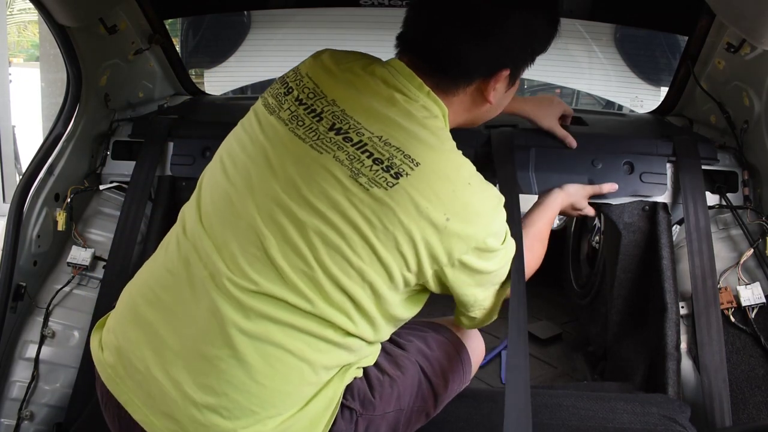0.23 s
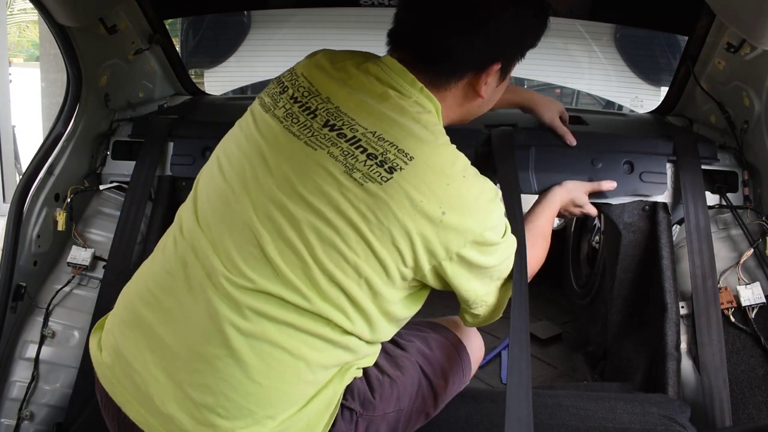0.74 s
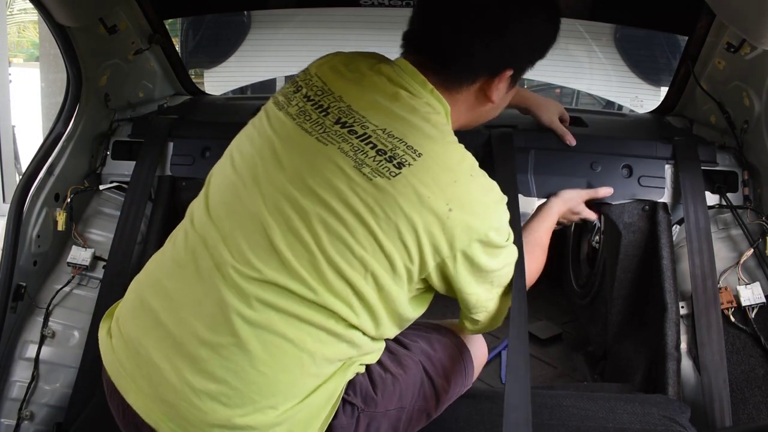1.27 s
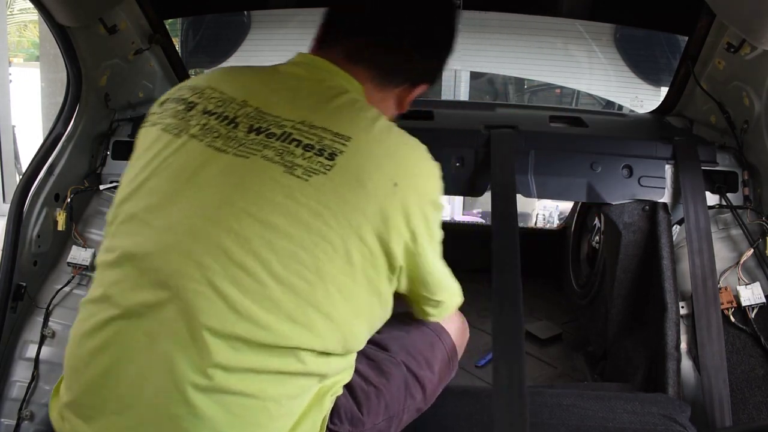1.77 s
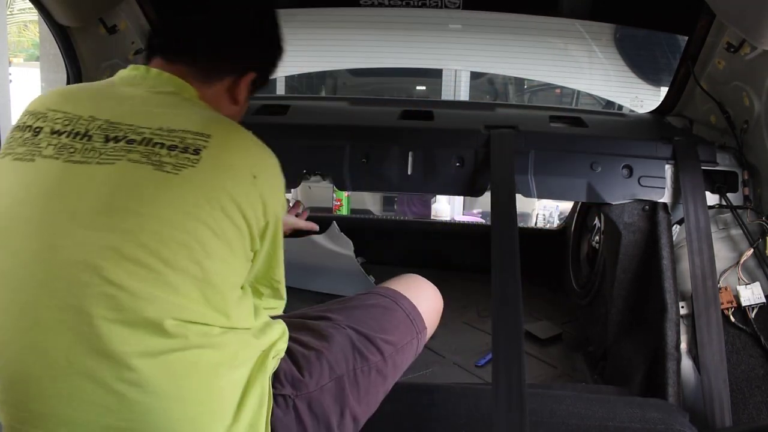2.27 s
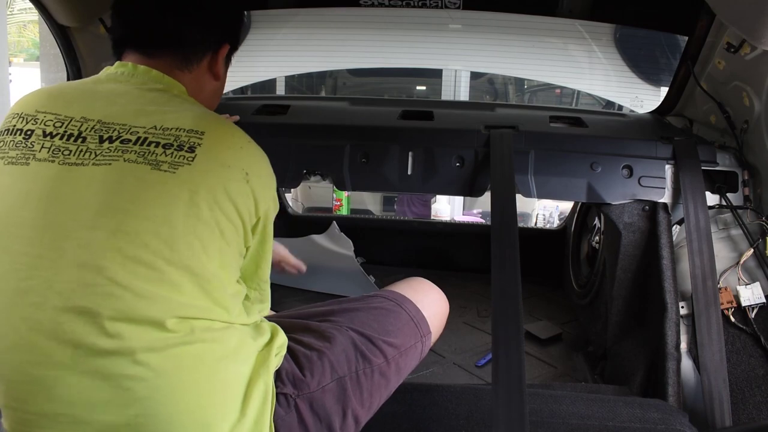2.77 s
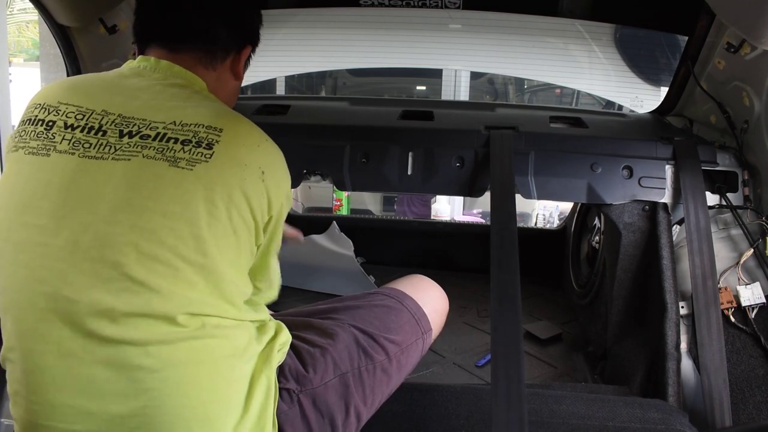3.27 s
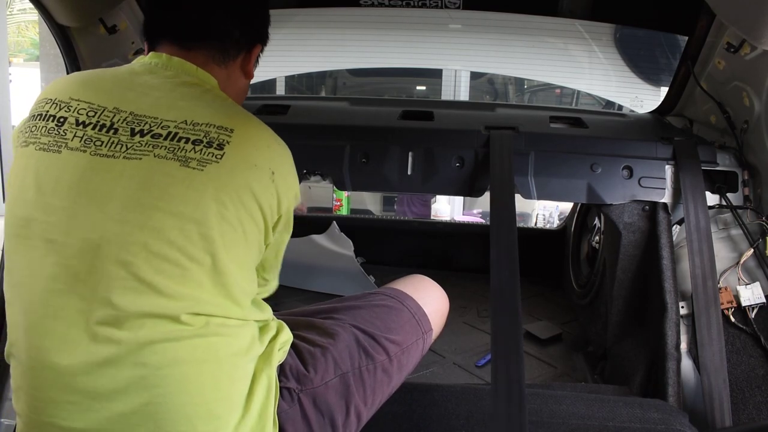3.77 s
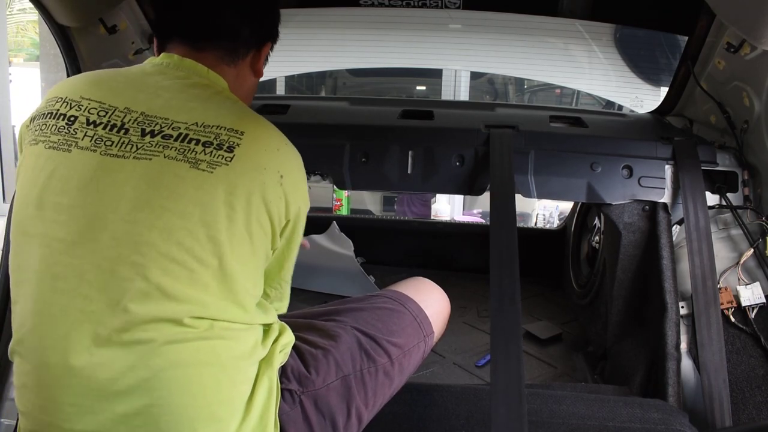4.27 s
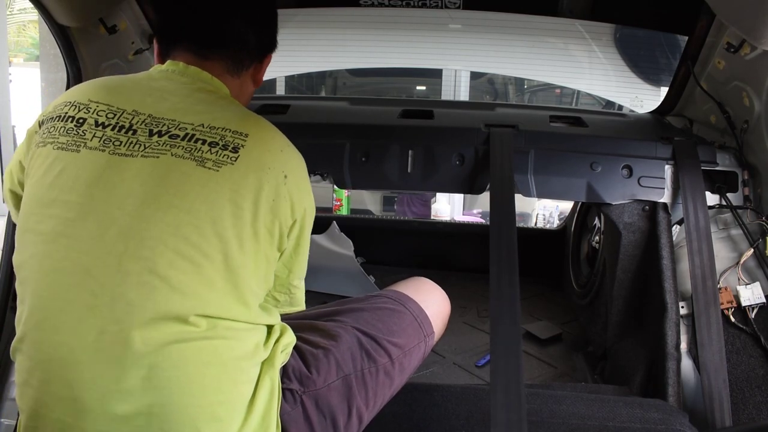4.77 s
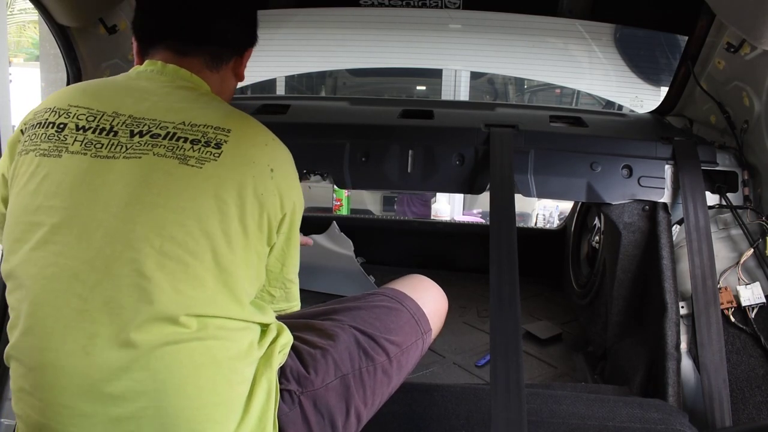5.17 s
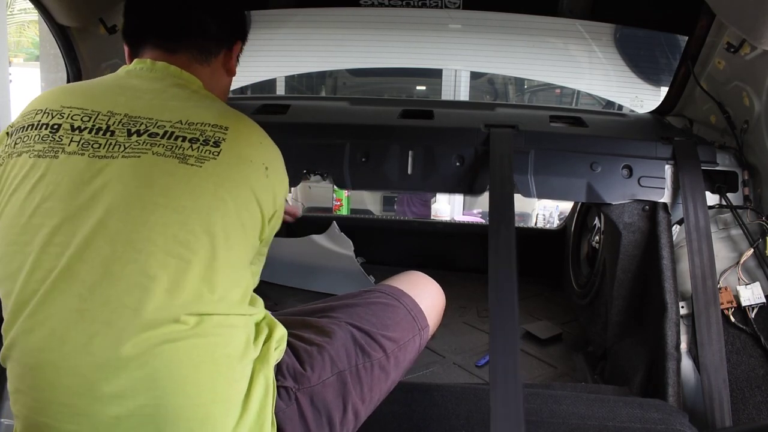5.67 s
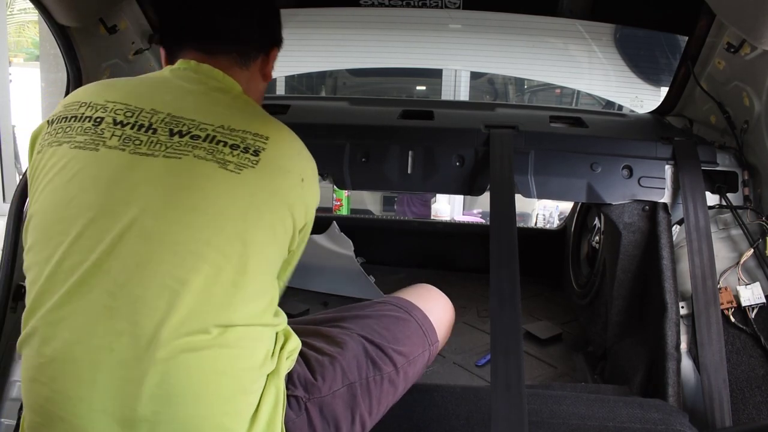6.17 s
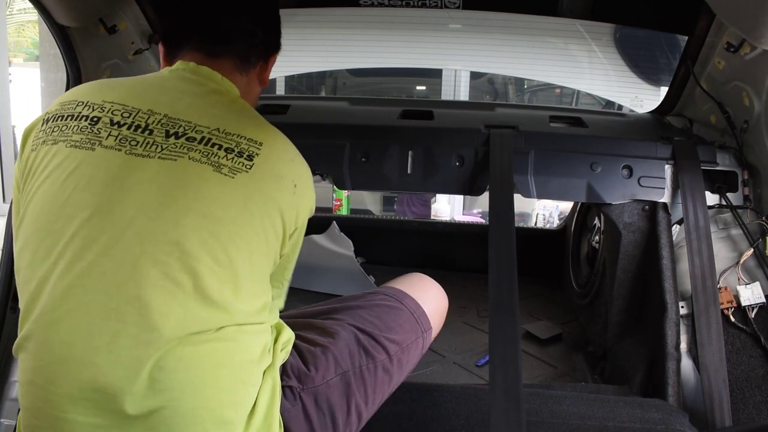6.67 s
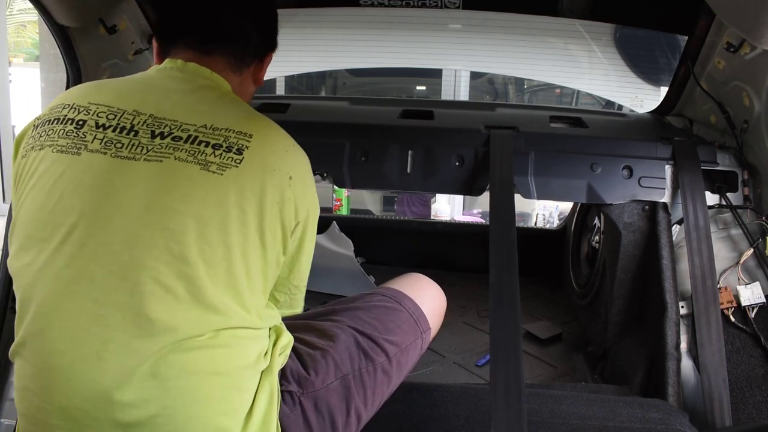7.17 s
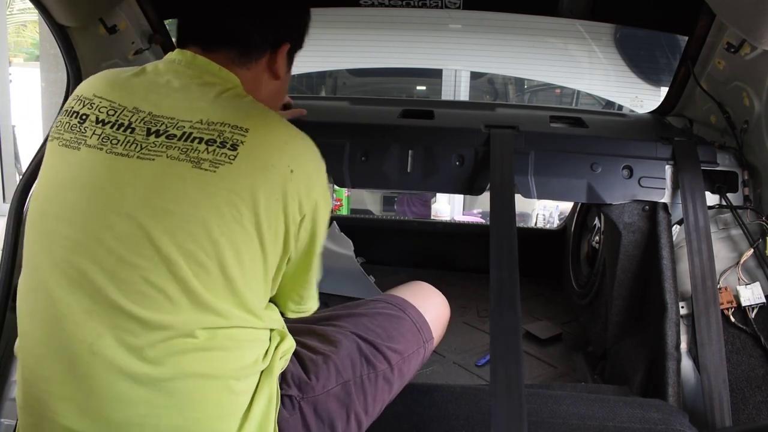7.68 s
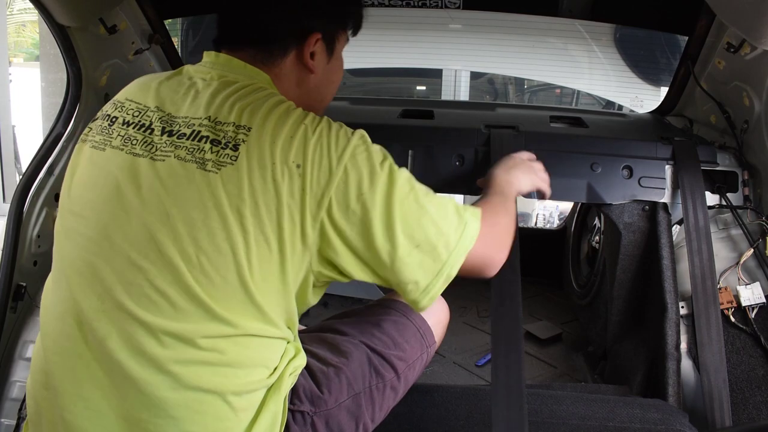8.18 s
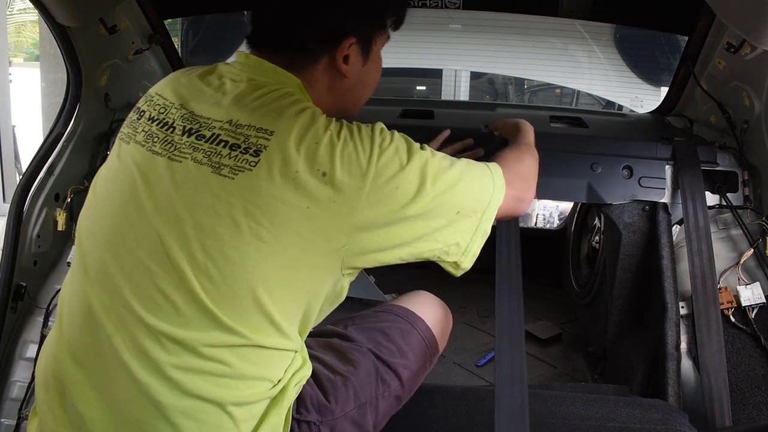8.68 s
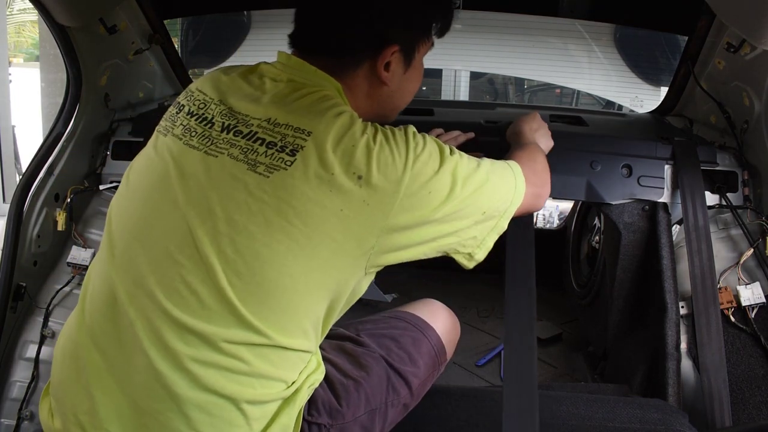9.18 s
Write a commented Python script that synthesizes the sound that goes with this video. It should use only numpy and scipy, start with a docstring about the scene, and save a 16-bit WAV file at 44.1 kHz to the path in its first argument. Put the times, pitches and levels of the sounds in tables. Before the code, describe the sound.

A small stripped car cabin with faint street wash and cloth rustle, heard through a dull, thin camera microphone. From 0.2 to 1.3 seconds, irregular light plastic knocks and clacks, a couple of them sharper at 0.8 and 1.3. Quiet handling until faint ticks at 2.1 to 2.3. From 2.6 to 4.5, hard palm blows come about every 0.3 seconds: a dull fleshy thump, bright crack of plastic on sheet metal, and loose rattle bouncing away. Low shelf booms climb slightly in pitch under the blows until about 4; one blow near 3.8 clips briefly. A lull holds only tiny contacts. Rattling thumps return at 5.7, 6.25, 6.6 and 6.9, with a softer swelling clatter around 7.45. Afterwards just faint rubs and taps at 8.5 to 9.3, one small knock at 9.0. Short sparse echoes follow each hit.

```python
"""Shelf trim beaten onto its clips

Inside a stripped car cabin a hand pushes and beats the rear shelf trim onto its clips. Shaped noise drives
ringing modes and broad colours: dull palm thuds, a clatter of plastic on sheet metal that bounces away, and
soft contacts and dense rattle swarms that swell up. The shelf booms as a low climbing note, sparse echoes give
the cabin, and street wash with cloth rustle comes from random spectra. A dull camera microphone overloads
once, as one wrapped sample."""
import sys
import numpy as np
from scipy import signal
from scipy.fft import rfft, irfft
from scipy.io import wavfile
from scipy.ndimage import uniform_filter1d, minimum_filter1d

SR = 44100
rng = np.random.default_rng(int(sys.argv[2]) if len(sys.argv) > 2 else 0)


def materialize(psi):
    """Save the field psi as 16-bit PCM at rate SR to the path in sys.argv[1].

    A 1-D psi becomes a single channel; in a 2-D psi each row is a channel.
    """
    bounded = np.clip(np.atleast_2d(psi).T, -1, 1)
    quanta = np.round(bounded * 32767).astype(np.int16)
    wavfile.write(sys.argv[1], SR, quanta)


N = 415422  # samples in the scene
LENGTH = 8192  # samples in one contact sound

# Palm landings: start_s, push_level_db, pitch_hz, dying_s, rattle_db (the level its rattle falls away from)
PALMS = [(2.627, -28.5, 546, 0.11, -25.5), (2.927, -16.5, 135, 0.21, -6), (3.19, -8.5, 358, 0.07, -5.5),
         (3.475, -13.5, 361, 0.12, -10), (3.736, -14, 358, 0.15, -8), (4.06, -13, 159, .067, -8.5),
         (4.136, -14, 142, 0.032, -18), (4.381, -10, 432, 0.036, -11), (5.674, -16.5, 343, 0.22, -14.5),
         (6.221, -27.5, 368, .1, -24), (6.245, -11.5, 426, 0.054, -16), (6.56, -14, 372, 0.21, -12),
         (6.912, -10.5, 375, 0.1, -6), (7.423, -30, 398, 0.15, -15)]
# Modes of the trim on its sheet metal: pitch_hz, level_db, t60_s
TRIM_MODES = [(767, 9.5, 0.024), (852, 3, 0.12), (957, 8.5, 0.079), (1088, 6, 0.039), (1305, 8.5, 0.0604),
              (1532, -8.5, 0.27), (1770, 0, 0.18), (2062, 3.5, 0.087), (2370, -14, .07), (2540, 0, 0.055),
              (2850, -3.5, .06), (3010, -12.5, 0.038), (3400, -14, .04), (3690, 6, 0.037), (3866, 6, 0.029)]
# Low modes of the body: pitch_hz, level_db, t60_s
BODY_MODES = [(138, 0.0045, 0.28), (189.3, 0.0019, 0.082), (248.4, 0, 0.055), (317, 0.017, 0.11),
              (398, 0.013, 0.023), (434.5, 0.024, 0.12), (502, 0, 0.061), (549, 0.011, 0.23),
              (680, 0.0088, .06)]
# Broad colour of the clatter: frequency_hz, relative_density_db (per Hz)
CLATTER_COLOUR = [(290, -41.5), (500, -3), (1210, -9), (1530, -4), (1930, -7), (2060, -7.5), (2230, -6),
                  (2920, -14), (5390, -24.5), (6160, -31.5), (7200, -58), (9360, -99), (15800, -120)]
# Broad colour of the thud: frequency_hz, relative_density_db (per Hz)
THUD_COLOUR = [(15, -38.5), (25, -18.5), (111, -1), (345, -1.5), (608, -6.5), (738, -15.5), (1040, -3.5),
               (1200, -23.5), (1560, -49), (2640, -120)]


def amp(db):
    """Decibels to gain."""
    return 10 ** (np.asarray(db) / 20)


def evened(x):
    """Scales to rms 1."""
    return x / np.sqrt(np.mean(x ** 2, axis=-1, keepdims=True) + 1e-20)


def read(points, hz):
    """Reads a table of (Hz, value) along a log-frequency axis."""
    f, value = np.transpose(points)
    return np.interp(np.log(hz + 1), np.log(f + 1), value)


def add(mix, start_s, sound):
    """Mixes a sound in at its start time."""
    part = mix[round(start_s * SR):][:len(sound)]
    part += sound[:len(part)]


def place(starts_s, sounds):
    """Mixes the sounds at their times, ends faded."""
    out = np.zeros(N)
    fade = signal.windows.tukey(2 * LENGTH, .3)[LENGTH:]
    for start_s, sound in zip(starts_s.ravel(), sounds * fade):
        add(out, start_s, sound)
    return out


def lowpass(x, hz):
    """Steep band limit by a long linear-phase filter."""
    taps = signal.firwin(511, hz, window=("kaiser", 9), fs=SR)
    return signal.oaconvolve(x, taps, "same")


def swell(rise_s, dying_s):
    """Envelope of peak 1: a rounded rise and a fall of 60 dB per dying time."""
    t = np.arange(LENGTH) / SR
    rise = (1 - np.exp(-t / np.clip(rise_s, 2e-4, .05))) ** 2
    shape = rise * amp(-60 * t / np.clip(dying_s, .006, .4))
    return shape / shape.max(axis=1, keepdims=True)


def causal(colour):
    """Minimum-phase response of a colour, so that nothing sounds before the blow."""
    hz = abs(np.fft.fftfreq(2 * LENGTH, 1 / SR))
    log_gain = np.log(amp(np.maximum(read(colour, hz), -100)))
    return np.exp(log_gain - 1j * signal.hilbert(log_gain).imag)[:LENGTH + 1]


def ringing(modes):
    """One decaying sine response per mode, of equal energy before its level."""
    t = np.arange(2 * LENGTH) / SR
    return np.array([amp(db) * rfft(evened(amp(-60 * t / t60) * np.sin(2 * np.pi * hz * t)))
                     for hz, db, t60 in modes])


def struck(modes, spot_hz, reach, far, colour):
    """Two responses of a struck spot: its modes, those near its pitch strongest, and a broad colour."""
    distance = np.log(np.array(modes)[:, 0] / spot_hz)
    weight = np.exp(-(distance / reach) ** 2) + far
    signs = rng.choice([-1., 1.], weight.shape)
    rings = (weight * signs) @ ringing(modes)
    hz = np.fft.rfftfreq(2 * LENGTH, 1 / SR) + 1
    # The damped spot itself lifts a wide band
    broad = 1 + 1.5 / (1 + 4j * (hz / spot_hz - spot_hz / hz))
    return np.array([rings, broad]) * causal(colour)


def drive(shape, responses, ring_share, grit_db):
    """Uneven small contacts, in clumps of about a millisecond, pass the ringing and the broad response."""
    noise, sizes = rng.standard_normal((len(shape), 2, LENGTH)).transpose(1, 0, 2)
    clumps = evened(uniform_filter1d(sizes, size=40))
    force = noise * shape * amp(grit_db * clumps)
    rings, broad = evened(irfft(rfft(force, 2 * LENGTH) * responses)[..., :LENGTH])
    ring_share = np.clip(ring_share, 0, 1)
    blend = evened(ring_share * rings + (1 - ring_share) * broad)
    # A longer envelope carries more energy
    return blend * np.sqrt(np.mean(shape ** 2, axis=1, keepdims=True))


def contacts(start_s, peak_db, bite_db, thud_db, spot_hz, thud_hz, dying_s, first_gain, rise_s):
    """A short first contact, then a swarm: clatter of the trim, its treble bite and a slower body thud."""
    # Stiff, high spots ring more: spot_pitch_hz, ring_share (0-1)
    ring_by_pitch = [(800, 0.2), (1500, 0.27), (2100, 0.4), (3000, 0.5)]
    low, high = (signal.freqz(*signal.butter(2, 2400, kind, fs=SR), LENGTH + 1)[1] for kind in ("low", "high"))
    first = first_gain * swell(0.00021 + 0 * start_s, 0.0069)

    clatter_shape = 0.99 * first + swell(0.0011 + rise_s, dying_s)
    spot = struck(TRIM_MODES, spot_hz, .07, .12, CLATTER_COLOUR)
    clatter = drive(clatter_shape, low * spot, read(ring_by_pitch, spot_hz), grit_db=4.5)
    clatter = clatter / abs(clatter).max(axis=1, keepdims=True)

    # The stiff clips ring high; gentle contacts are duller
    clip = struck(TRIM_MODES, 3050 + 0 * start_s, .08, .2, CLATTER_COLOUR)
    dulling_hz = 6000 * amp(0.3 * peak_db)
    clip = clip / (1 + 1j * np.fft.rfftfreq(2 * LENGTH, 1 / SR) / dulling_hz)
    bite_shape = first + swell(0.0024 + rise_s, 0.6 * dying_s)
    bite = drive(bite_shape, high * clip, ring_share=0.38, grit_db=3.0)

    body = struck(BODY_MODES, thud_hz, 0.082, .2, THUD_COLOUR)
    thud_shape = swell(0.00063 + rise_s, 1.08 * dying_s)
    thud = drive(thud_shape, body, ring_share=.47, grit_db=1.0)

    treble_and_clatter = amp(peak_db) * (clatter + amp(bite_db) * bite)
    return place(start_s, treble_and_clatter + amp(thud_db) * thud)


def knocks():
    """Hard contacts of trim and metal start at once, with a strong first crack."""
    # Distinct contacts: start_s, clatter_peak_db, bite_db (above 2.4 kHz, against the clatter peak),
    # thud_level_db, spot_pitch_hz, thud_pitch_hz, dying_s (bite and thud scale it)
    knock_table = [(0.17, -20, -19.5, -35.5, 1400, 530, 0.14), (0.32, -12, -15, -18, 1270, 283, 0.11),
                   (0.425, -23.5, -6, -37.5, 1430, 256, 0.13), (0.566, -16.5, -12.5, -29, 1060, 465, 0.087),
                   (0.8, -8.5, -19, -22, 1140, 520, 0.11), (0.864, -23.5, -19, -26.5, 1590, 536, 0.044),
                   (1, -24, -22, -38, 1540, 511, 0.12), (1.044, -25, -26, -32, 1730, 390, 0.28),
                   (1.277, -33, -3, -34, 1960, 500, 0.12), (1.312, -6, -10, -25.5, 2200, 475, 0.068),
                   (2.107, -38, -17, -33.5, 703, 468, 0.16), (2.205, -34, -18, -29, 1320, 208, 0.077),
                   (2.321, -26, -28, -31.5, 1450, 208, 0.069), (2.663, -10.5, -13, -18, 1810, 500, 0.071),
                   (2.676, -14.5, -10, -20, 1660, 266, 0.12), (2.741, -17.5, -38, -23, 1130, 141, 0.05),
                   (2.94, -8, -9, -20, 840, 127, 0.087), (2.964, -3, -14.5, -17.5, 1520, 344, 0.13),
                   (2.974, -6, -10, -21.5, 2570, 323, 0.043), (3.017, -22, -8.5, -13.5, 960, 141, 0.1),
                   (3.202, -5, -8.5, -12.5, 705, 363, 0.06), (3.225, -4.5, -9.5, -21.5, 1820, 540, 0.065),
                   (3.235, -3, -10, -24, 1690, 670, 0.068), (3.291, -10.5, -14, -20.5, 1730, 148, 0.22),
                   (3.483, -7.5, -7, -10.5, 753, 360, 0.074), (3.502, -15, -5, -21, 1550, 320, 0.16),
                   (3.518, -2, -9.5, -20, 3060, 331, 0.045), (3.557, -15.5, -11, -18, 942, 145, 0.2),
                   (3.746, -6.5, -9.5, -12.5, 3030, 376, 0.078), (3.77, -12, -9, -11, 974, 385, 0.071),
                   (3.784, -5, -4, -18, 2910, 368, 0.06), (3.837, -15.5, -16, -20.5, 1410, 147, 0.2),
                   (4.071, 0.5, -15.5, -12, 740, 227, 0.092), (4.095, -3, -17, -17, 1530, 620, 0.15),
                   (4.149, -3, -12.5, -19, 2060, 447, 0.081), (4.163, -22, -19, -18, 2060, 564, 0.13),
                   (4.199, -18, -10, -18.5, 1570, 423, 0.089), (4.392, -7.5, -8, -13.5, 696, 336, 0.16),
                   (4.415, -4, -13, -17, 1330, 421, 0.13), (4.456, -6.5, -12.5, -16.5, 1770, 248, 0.11),
                   (4.555, -26.5, -10, -30, 2420, 500, 0.058), (4.942, -29.5, -15.5, -56, 1800, 307, 0.11),
                   (5.114, -32, -27, -50, 950, 544, 0.093), (5.296, -27.5, -21.5, -46, 1420, 428, 0.074),
                   (5.594, -33, -16.5, -27, 1130, 464, 0.089), (5.682, -9, -14.5, -21.5, 2500, 350, 0.2),
                   (5.711, -6, -12, -20, 1550, 450, 0.091), (5.742, -13.5, -12, -21, 2050, 367, 0.18),
                   (6.253, -11.5, -12, -18, 2040, 432, 0.13), (6.278, -5, -12, -20, 1760, 417, 0.2),
                   (6.308, -14, -4, -21.5, 1750, 450, 0.14), (6.353, -16, -7.5, -24, 1770, 495, 0.061),
                   (6.573, -6.5, -11.5, -11.5, 1190, 385, 0.14), (6.602, -1, -10.5, -16, 1330, 560, 0.07),
                   (6.639, -11.5, -4.5, -20, 1800, 514, 0.071), (6.655, -3.5, -13.5, -28, 2100, 657, 0.12),
                   (6.692, -13, -10, -24.5, 2030, 550, 0.14), (6.923, -4, -10, -6.5, 1300, 376, 0.067),
                   (6.941, -12.5, -19, -25, 970, 385, 0.15), (6.969, -11, -11, -17.5, 810, 416, 0.23),
                   (7.008, -3.5, -12.5, -17, 1790, 425, 0.12), (7.045, -11.5, -8, -17.5, 1780, 433, 0.081),
                   (7.465, -8, -7, -21, 2100, 189.5, 0.087), (7.502, -15, -12, -29, 1580, 502, 0.18),
                   (8.468, -36.5, -12, -40, 1560, 446, 0.15), (8.995, -21.5, -11.5, -35.5, 1100, 600, 0.11)]
    columns = np.transpose(knock_table)[:, :, None]
    return contacts(*columns, first_gain=amp(-0.5), rise_s=0 * columns[0])


def palms():
    """Soft flesh gives a slow push on the body with a faint slap on the trim."""
    start_s, push_db, pitch_hz, dying_s = np.transpose(PALMS)[:4, :, None]
    slap_db = -13.5  # against the push
    shape = swell(.005, dying_s)
    body = struck(BODY_MODES, pitch_hz, 0.21, 0.17, THUD_COLOUR)
    push = drive(shape, body, ring_share=0.64, grit_db=-3.0)
    trim = struck(TRIM_MODES, pitch_hz, 1, 1, CLATTER_COLOUR)
    slap = drive(shape, trim, ring_share=0, grit_db=2.0)
    return place(start_s, amp(push_db) * (push + amp(slap_db) * slap))


def rattles(count=7):
    """After each palm the loose trim bounces at uneven moments, ever weaker but for a small random spread."""
    from_s, to_s = .025, .26  # after the palm
    fall_db_per_s, spread_db = 114, 1
    bite_db, thud_db = -10, -11.5  # against each bounce
    when, size, spot, body = rng.random((len(PALMS), count, 4)).transpose(2, 0, 1)
    after_s = from_s + (to_s - from_s) * (np.arange(count) + when) / count
    palm_s, rattle_db = np.array(PALMS)[:, [0, 4]].T[:, :, None]
    peak_db = rattle_db - fall_db_per_s * after_s + spread_db * (2 * size - 1)
    start_s, peak_db = (palm_s + after_s).reshape(-1, 1), peak_db.reshape(-1, 1)
    spot_hz = np.interp(spot, (0, 1), (1000, 2100)).reshape(-1, 1)
    thud_hz = np.interp(body, (0, 1), (150, 532)).reshape(-1, 1)
    return contacts(start_s, peak_db, bite_db, peak_db + thud_db, spot_hz, thud_hz,
                    dying_s=0.12, first_gain=0.27, rise_s=0 * start_s)


def swarms():
    """Soft contacts and dense rattle swarms on the trim: they swell up, with no first crack."""
    # Swarms: start_s, clatter_peak_db, rise_s (added to each layer's own rise), dying_s (bite and thud scale it)
    swarm_table = [(2.625, -22.5, .02, 0.19), (2.84, -39.5, .04, .3), (5.575, -26, 0.025, 0.19),
                   (6.265, -14, 0.013, 0.19), (7.389, -25, .04, 0.2), (7.435, -16, 0.027, 0.21),
                   (8.721, -32.5, 0.018, 0.28), (8.751, -34, .004, 0.065), (8.85, -32, 0.044, 0.38),
                   (9.246, -32.5, .02, 0.11)]
    start_s, peak_db, rise_s, dying_s = np.transpose(swarm_table)[:, :, None]
    bite_db, thud_db = -14.5, -15  # against the clatter peak
    spot_hz, thud_hz = 1480 + 0 * start_s, 418 + 0 * start_s
    return contacts(start_s, peak_db, bite_db, peak_db + thud_db, spot_hz, thud_hz, dying_s,
                    first_gain=0, rise_s=rise_s)


def booms():
    """The shelf springs back: one low note swells, climbs and dies; the higher notes ride with it."""
    # Spring-backs: start_s, low_note_peak_db
    boom_table = [(2.737, -32.5), (3.014, -15.5), (3.282, -15), (3.552, -13.5), (3.833, -15.5)]
    # Higher notes of the shelf: pitch_hz, level_db (against the low note)
    shelf_notes = [(250, -13.5), (435, -16), (560, -12.5)]
    start_hz, settled_hz = 140.4, 168.2  # the note climbs as the shelf beds down on its clips
    climb_s, swell_s, dying_s = 0.042, 0.015, 0.3
    out, t = np.zeros(N), np.arange(SR // 2) / SR
    low_hz = settled_hz - (settled_hz - start_hz) * np.exp(-(t / climb_s) ** 2)
    low_note = np.sin(2 * np.pi * np.cumsum(low_hz) / SR)
    notes = low_note + sum(amp(db) * np.sin(2 * np.pi * hz * t) for hz, db in shelf_notes)
    shape = (1 - np.exp(-t / swell_s)) * amp(-60 * t / dying_s)
    for start_s, peak_db in boom_table:
        add(out, start_s, amp(peak_db) * shape / shape.max() * notes)
    return out


def cabin(x):
    """Sparse echoes of random sign off glass and bare metal, each band dying at its own speed."""
    # Decay of the cabin: frequency_hz, t60_s
    cabin_decay = [(200, 0.56), (3000, 0.34), (6000, 0.55)]
    taps = np.zeros(SR // 2)
    at = np.arange(100, SR // 2 - 20, 20)
    taps[at + rng.integers(0, 20, len(at))] = rng.choice([-1., 1.], len(at))
    hz, t, spectra = signal.stft(taps, SR, nperseg=256)
    decay = amp(-60 * t / read(cabin_decay, hz)[:, None])
    tail = signal.istft(spectra * decay, SR, nperseg=256)[1]
    return signal.fftconvolve(x, tail / np.linalg.norm(tail))[:N]


def wash():
    """Street wash and cloth rustle: random short-time spectra with drifting patches and a light flicker."""
    # Colour of the wash: frequency_hz, relative_density_db (per Hz)
    wash_colour = [(30, -24), (190, -3.5), (310, -8), (500, -3), (800, -8), (1100, -6), (1550, 0.5),
                   (2000, -5), (2700, -11), (3800, -19), (5300, -33.5), (7200, -51)]
    # Course of wash and rustle: time_s, relative_level_db, rumble_db (extra weight under 700 Hz)
    stir = [(0.0, -44, 4.5), (0.97, -42, 1.5), (2.02, -45.5, 1), (3.67, -37, 7.5), (4.85, -46.5, 1),
            (5.51, -47.5, -2), (6.9, -40.5, 7), (7.66, -48, 2.5), (9.42, -45, 5.5)]
    frames, hz = N // 128 + 5, np.fft.rfftfreq(512, 1 / SR)[:, None]
    real, imag, patches = rng.standard_normal((frames, 257, 3)).T
    patches = uniform_filter1d(uniform_filter1d(patches, size=16, axis=1), size=5, axis=0)
    patches_db = 2.0 * patches / patches.std()
    flicker_db = 0.3 * evened(uniform_filter1d(rng.standard_normal(frames), size=5))

    time_s, level_db, rumble_db = np.transpose(stir)
    t = np.arange(frames) * 128 / SR
    level_now_db = np.interp(t, time_s, level_db)
    tilt_db = np.interp(t, time_s, rumble_db) / (1 + (hz / 700) ** 4)
    # Busier is brighter
    tilt_db += 0.22 * (level_now_db - level_db.min()) / (1 + (2500 / (hz + 1)) ** 4)
    spectra = (real + 1j * imag) * amp(patches_db + flicker_db + tilt_db + level_now_db)
    uncoloured = signal.istft(spectra, nperseg=512, noverlap=384)[1][:N]

    colour = amp(read(wash_colour, np.fft.rfftfreq(N, 1 / SR)))
    colour = colour / np.sqrt(np.mean(colour ** 2))
    return amp(-20.5) * irfft(rfft(uncoloured) * colour, N)


def scene():
    """Blows, rattles and swarms with their cabin echoes, the booms and the wash."""
    blows = knocks() + palms() + rattles() + swarms()
    echoes = amp(-10.5) * cabin(blows)
    return (blows + echoes + booms() + wash())[None]


def record(dry):
    """Thin dull microphone, peak limiter, one wrapped sample, converter hiss, band limit."""
    overload_s, overload_db, hiss_db = 3.7853, 5, -102
    x = signal.sosfilt(signal.butter(2, 75, "high", fs=SR, output="sos"), dry[0])
    x = signal.sosfilt(signal.butter(4, 5600, fs=SR, output="sos"), x)
    x = lowpass(x, 7100)
    # Sliding peak, smoothed, holds the level near 0.93
    peak = uniform_filter1d(-minimum_filter1d(-abs(x), size=161), size=81)
    x = x / np.maximum(peak / .93, 1)
    # The deepest trough near the overload wraps round to the top
    near = round(overload_s * SR) + np.arange(-30, 30)
    x[near[np.argmin(x[near])]] += amp(overload_db)
    hiss = amp(hiss_db) * rng.standard_normal(N)
    return lowpass(x + hiss, 16400)[None]


dry = scene()
out = record(dry)
materialize(out)
```